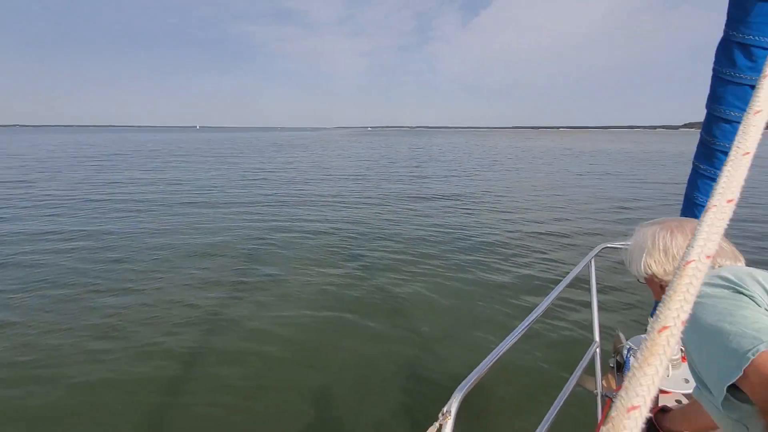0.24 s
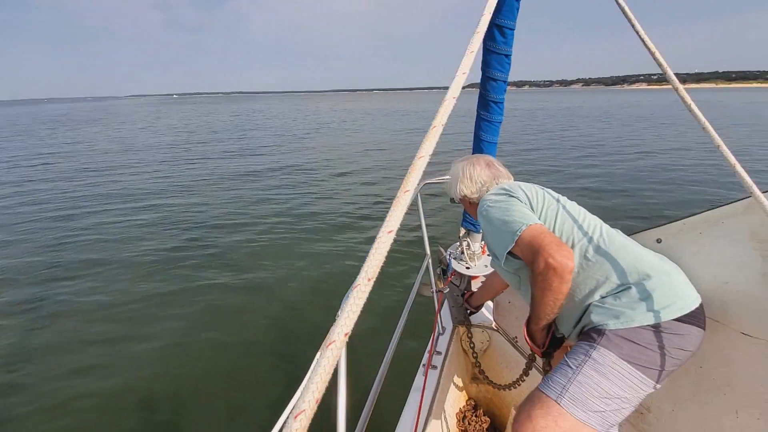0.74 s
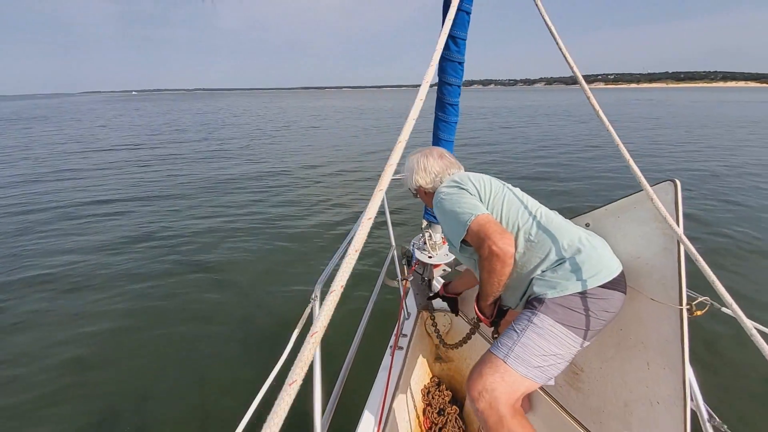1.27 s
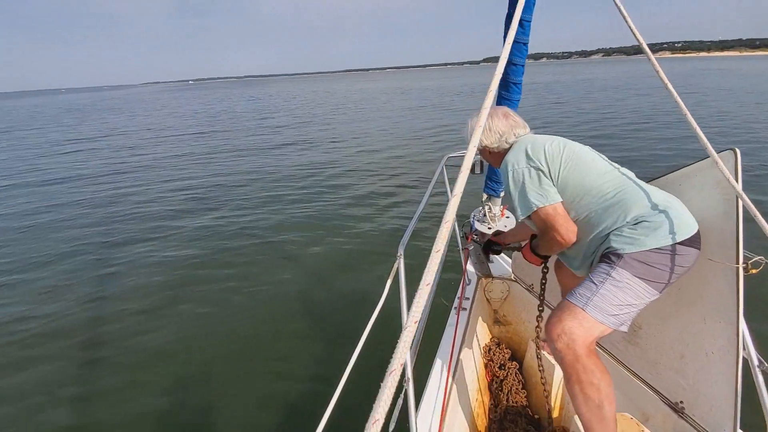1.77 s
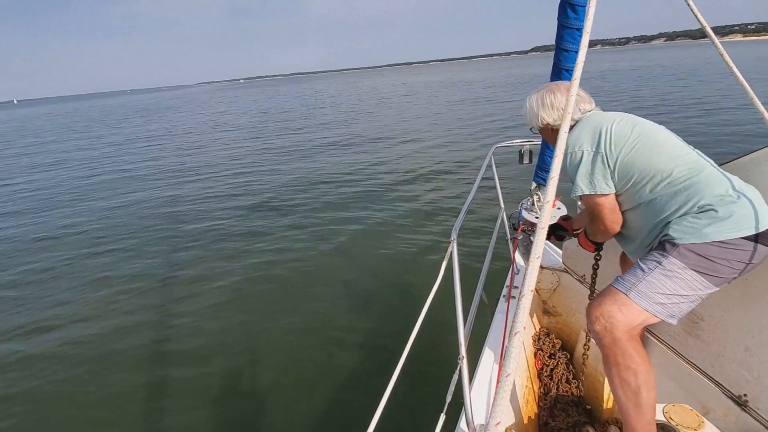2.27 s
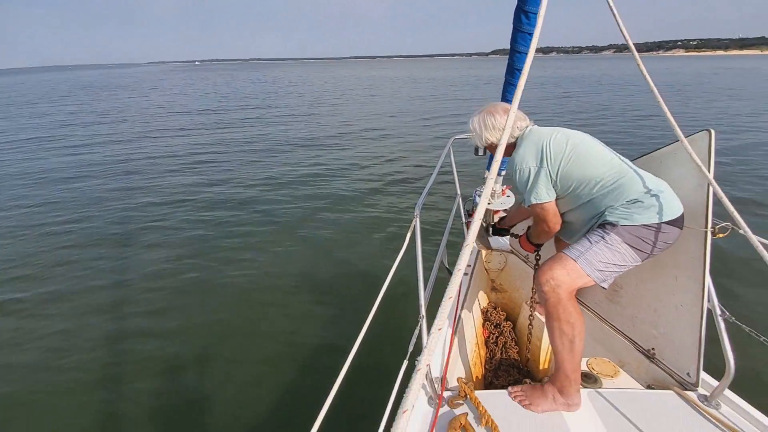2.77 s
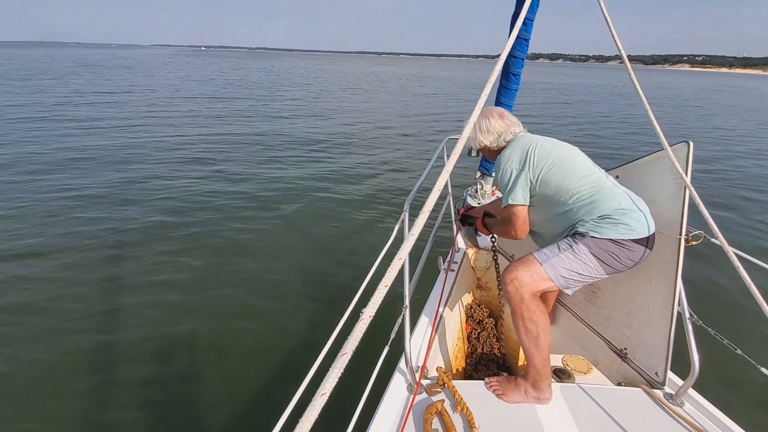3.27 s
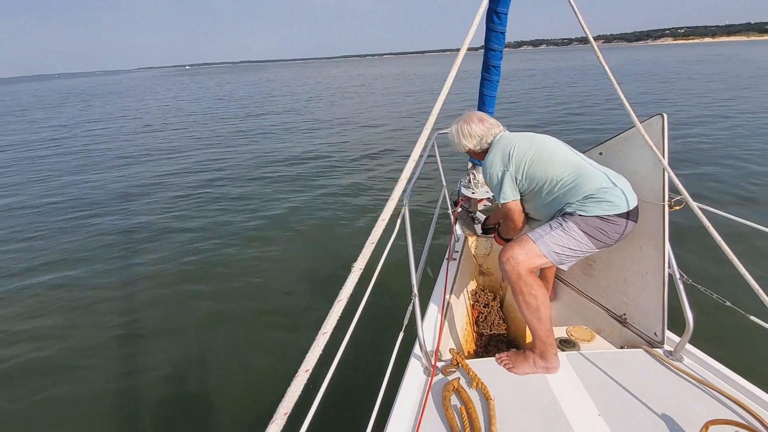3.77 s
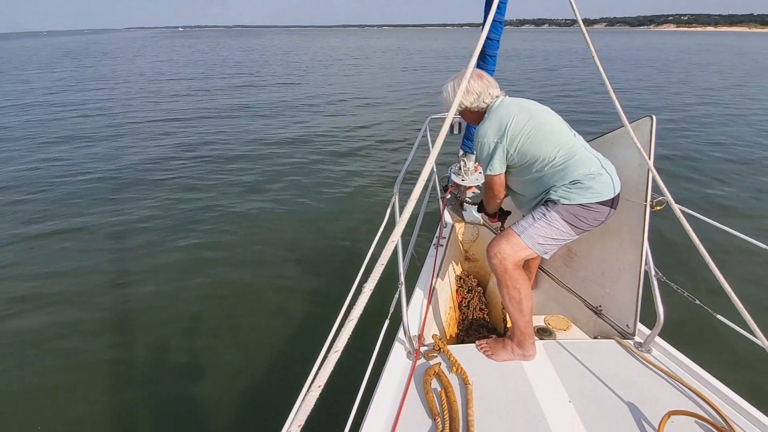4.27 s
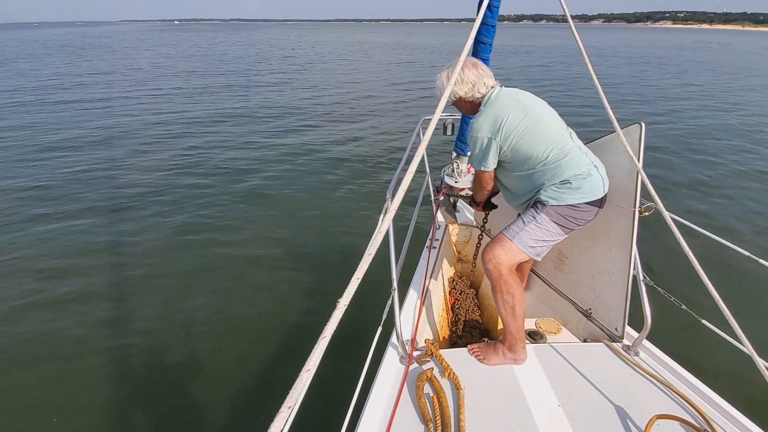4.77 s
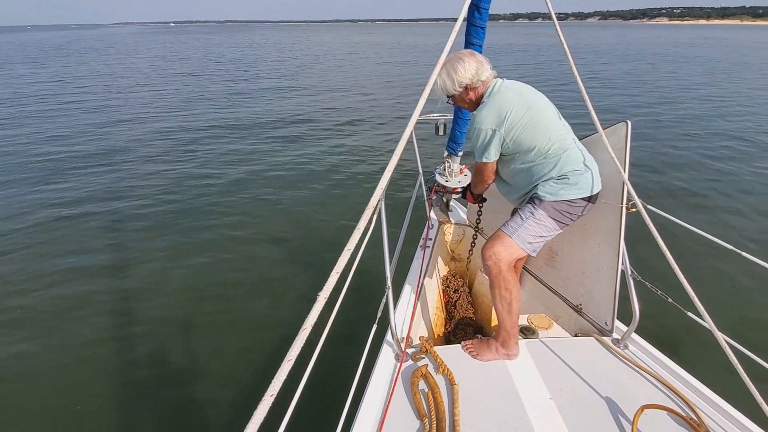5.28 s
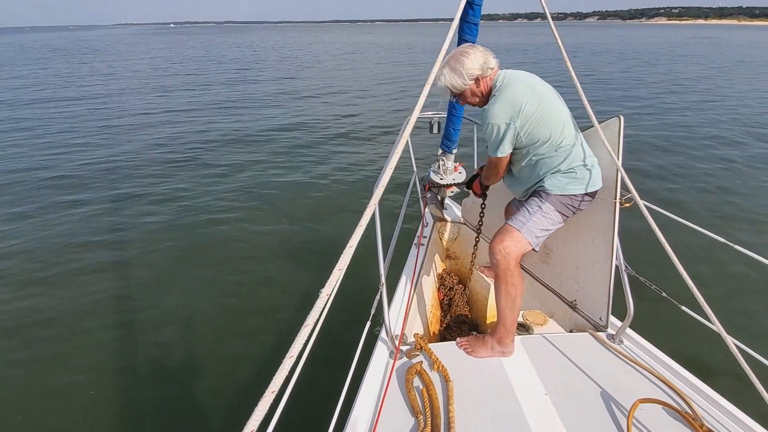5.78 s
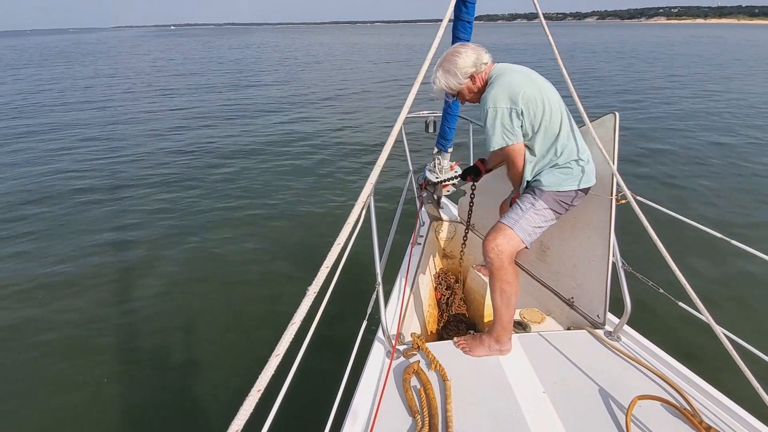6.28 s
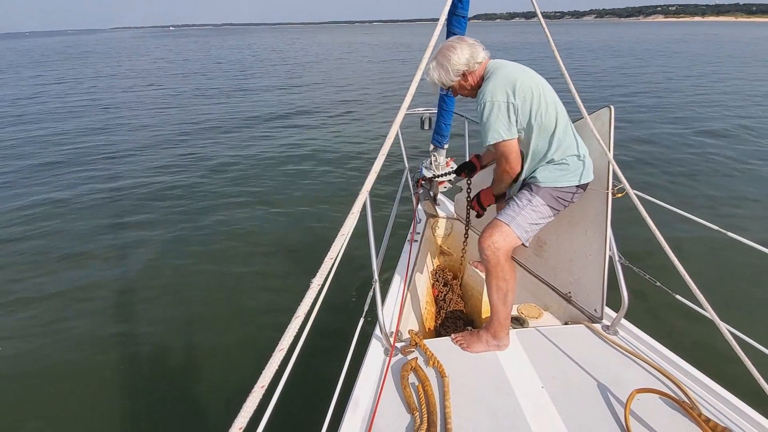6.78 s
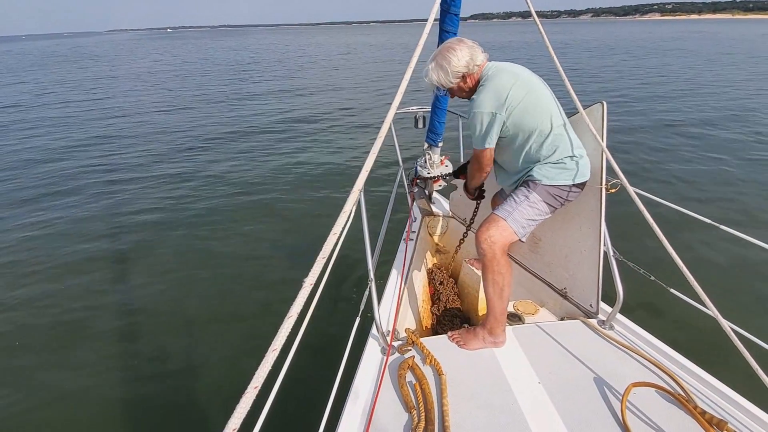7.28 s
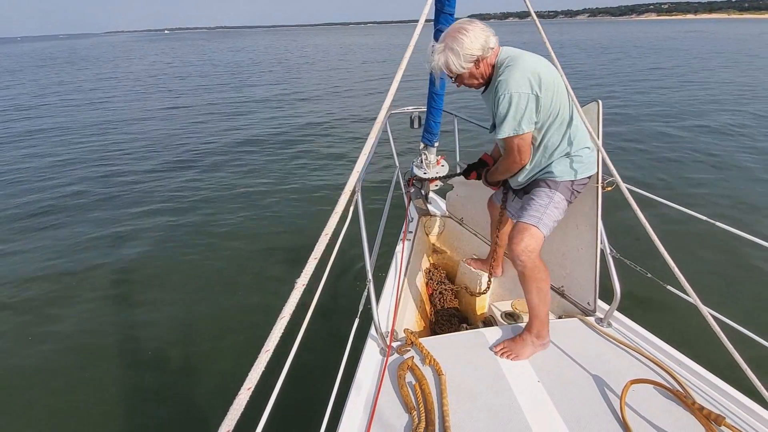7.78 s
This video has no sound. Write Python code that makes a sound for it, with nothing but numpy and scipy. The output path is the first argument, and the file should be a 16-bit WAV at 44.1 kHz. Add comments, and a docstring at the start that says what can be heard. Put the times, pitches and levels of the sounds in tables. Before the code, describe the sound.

On the bow of a small boat on calm open water, heavy chain is handled by hand. A fading metallic ring opens, followed by sparse clinks, then a sharp clattering burst. After a quiet gap, a dense bright run of clacks rings on the steel roller. Shorter pulls follow, ending in a few hard knocks. The hollow hull thumps underneath; water laps faintly. One outdoor microphone, close and dry.

```python
"""Anchor chain over a bow roller

On the bow of a small boat on calm water, an anchor chain is let out by hand, heard at one microphone.
Links clack on the steel roller and the locker edge as shaped noise bursts; roller and rail ring on as
decaying sines. Loose links rattle in between as noise and clinks from random contacts, and the hollow
hull rumbles as filtered thumps. Water laps as swelling noise; short rising chirps are gliding sines,
bubbles at the waterline or squeaks of links."""
import sys
import numpy as np
from scipy import signal
from scipy.fft import rfft, irfft
from scipy.io import wavfile
from scipy.ndimage import uniform_filter1d

SR = 44100
rng = np.random.default_rng(int(sys.argv[2]) if len(sys.argv) > 2 else 0)


def ratio(d):
    """dB to gain"""
    e = np.asarray(d, float) / 20
    return 10 ** e


def unload_wav(signal):
    """Save mono or channel-first audio to the path in sys.argv[1] as 16-bit WAV at rate SR, clipped to [-1, 1]."""
    wavfile.write(
        sys.argv[1],
        SR,
        np.round(np.clip(np.atleast_2d(signal).T, -1, 1) * 32767).astype(np.int16),
    )


N = 354123  # length in samples


def evened(x):
    """Scales to rms 1."""
    return x / np.sqrt(np.mean(x ** 2) + 1e-20)


def read(points, hz):
    """Value of a spectrum table on a log-frequency axis."""
    f, value = np.transpose(points)
    return np.interp(np.log(hz + 1), np.log(f + 1), value)


def add(mix, s, sound):
    """Mixes a sound in at s seconds."""
    part = mix[round(s * SR):][:len(sound)]
    part += sound[:len(part)]


def colour(x, points):
    """Filters x by a spectrum table."""
    gain = ratio(read(points, np.fft.rfftfreq(len(x), 1 / SR)))
    return irfft(rfft(x) * gain, len(x))


def ring(pushes, modes_hz, modes):
    """Row k of pushes drives mode k, a two-pole resonator that rings as a decaying sine."""
    out = np.zeros(N)
    for push, hz, (db, t60) in zip(pushes, modes_hz, modes):
        radius = 1000 ** (-1 / (t60 * SR))
        turn = 2 * np.pi * hz / SR
        poles = [1, -2 * radius * np.cos(turn), radius * radius]
        out += ratio(db) * signal.lfilter([np.sin(turn)], poles, push)
    return out


def ticks(per_s, spread_db):
    """Random contacts of uneven size and either sign."""
    size = ratio(spread_db * np.minimum(rng.exponential(1, N), 5))
    return size * (rng.random(N) < per_s / SR) * rng.choice([-1., 1.], N)


def gated_noise(contacts, t60, bed):
    """Noise that flares at each contact and falls 60 dB in t60 seconds towards a steady bed."""
    puff_power = ratio(-120 * np.arange(4000) / SR / t60)
    power = abs(signal.oaconvolve(contacts ** 2, puff_power)[:N]) + bed
    return np.sqrt(power) * rng.standard_normal(N)


# Stretches of chain sound, one curve each: pulls, dying away, quiet swaying between.
# Each row of a curve: time in seconds, rattle level in dB.
STRETCHES = [
    [(0, -35.5), (.12, -43.5), (.19, -50), (.3, -65), (.6, -72), (.68, -60), (.922, -61)],
    [(.94, -44.5), (1.1, -50), (1.24, -41), (1.44, -39.5)],
    [(1.502, -29.5), (1.63, -22.5), (1.698, -27.5), (1.779, -37.5), (1.89, -60)],
    [(1.915, -45), (1.96, -45), (1.984, -29), (2.05, -28), (2.16, -44.5), (2.28, -52.5), (2.477, -66.5)],
    [(2.495, -38.5), (2.55, -47.5), (2.585, -56.5), (2.645, -40.5), (2.67, -50), (2.76, -55.5),
     (2.79, -60.5)],
    [(2.83, -65), (3.375, -71)],
    [(3.385, -50.5), (3.42, -51.5), (3.44, -43.5), (3.67, -37.5), (3.76, -54), (3.88, -63.5)],
    [(3.921, -42.5), (3.981, -31.5), (4.062, -32), (4.13, -45), (4.22, -42)],
    [(4.36, -32.5), (4.519, -26), (5.059, -28), (5.25, -33), (5.4, -27.5), (5.55, -40), (5.66, -40)],
    [(5.7, -60.5), (5.82, -54.5), (6.05, -70), (6.172, -61)],
    [(6.202, -41.5), (6.35, -35), (6.47, -32), (6.55, -47.5), (6.59, -56), (6.7, -68.5), (6.84, -75)],
    [(6.89, -58.5), (6.93, -77.5), (7.1, -84.5), (7.298, -70)],
    [(7.349, -40.5), (7.45, -44.5), (7.64, -54), (7.7, -46), (7.9, -46.5), (8.03, -53)],
]


def chain_level_db(late_s=0):
    """Level of the chain in dB, per sample, delayed by late_s."""
    return np.interp(np.arange(N) / SR - late_s, *np.vstack(STRETCHES).T)


# How the chain lies in each stretch, in the order of STRETCHES.
# Each row: hull rumble offset in dB, brightness in dB, relative ringing of the roller over the rattle in dB.
STRETCH_COLOURS = [(0, -12, -1), (1.5, -8, -27), (1, 0.5, -2), (1, 4.5, -7), (2.5, 6, 0.5), (-2, 11, -5.5),
                   (0.5, 6, -9.5), (0.5, 5.5, -7), (-1.5, 6.5, 5.5), (-3.5, -20.5, -15.5), (-1.5, 3, -26.5),
                   (5.5, -9, -13), (-7, 2.5, -20)]


def per_stretch(column):
    """One column of STRETCH_COLOURS, held through each stretch and gliding to the next."""
    ends = [rows[k][0] for rows in STRETCHES for k in (0, -1)]
    return np.interp(np.arange(N) / SR, ends, np.repeat(np.array(STRETCH_COLOURS)[:, column], 2))


def clinks(count):
    """Rusty links knock together; each rings briefly on a pitch of its own."""
    train = ticks(2500, 3.5)
    link = rng.integers(0, count, N)
    t = np.arange(2500) / SR
    pitches = np.geomspace(900, 6500, count)[:, None]  # Hz
    voices = np.sin(2 * np.pi * pitches * t) * ratio(-60 * t / 0.079) * np.sqrt(pitches)
    return sum(signal.oaconvolve(train * (link == k), voice)[:N] for k, voice in enumerate(voices))


# Colour of the loose links. Each row: frequency in Hz, level in dB per Hz.
RATTLE_COLOUR = [(290, -36.5), (500, 11.5), (603, -9), (717, 3), (1830, 1.5), (2440, 1.5), (2620, 2.5),
                 (4670, 4.5), (5350, -6), (5750, -1), (6300, -18.5), (7000, -7), (7800, -13), (9500, -13),
                 (10800, -20.5), (15600, -30.5)]


def rattle():
    """Scraping and clinking links, brighter when the chain is taut, thinner when it barely moves."""
    scrape = evened(gated_noise(ticks(260, 3.2), t60=.014, bed=.7))
    links = evened(colour(scrape + ratio(-0.5) * evened(clinks(count=90)), RATTLE_COLOUR))
    low = signal.sosfiltfilt(signal.butter(2, 2600, fs=SR, output="sos"), links)
    high = signal.sosfiltfilt(signal.butter(4, 6200, "high", fs=SR, output="sos"), links)
    middle = links - low - high
    bright_db, level_db = per_stretch(column=1), chain_level_db()
    low_gain = ratio(-.4 * bright_db + 0.13 * (level_db + 39.5))
    return ratio(level_db) * (low * low_gain + middle + high * ratio(bright_db))


# Modes of the steel roller and its cheeks: a list of frequencies in Hz, and in the same order
# each row: level in dB, 60 dB decay in seconds. Single blows shift these values further.
ROLLER_HZ = [1632, 2433, 2702, 3155, 3285, 3395, 3600, 4390, 4775, 4952, 5085, 5713, 7111, 8497, 8860, 9236,
             10130, 11105, 12580, 13930, 14690]
ROLLER_MODES = [(-11, .14), (-7, .2), (-9, .14), (-12, .15), (-6, .2), (-11, .15), (-9, .08), (0, .15),
                (-9, .18), (-6, .22), (-8, .18), (-10, .2), (-15, .2), (-12, .18), (-22, .15), (-25, .2),
                (-24, .15), (-22, .13), (-19, .16), (-30, .15), (-33, .15)]


def roller_under_chain():
    """Some contacts of the chain ring the roller, each on one mode, the high modes less."""
    train = ticks(1800, 0.83) * ratio(chain_level_db() + per_stretch(column=2) - 14.5)
    spot = rng.integers(0, len(ROLLER_HZ), N)
    pushes = (train * (spot == k) * min(1, 5700 / hz) ** 1.5 for k, hz in enumerate(ROLLER_HZ))
    return ring(pushes, ROLLER_HZ, ROLLER_MODES)


def roller_blow(chance, peak_db, centre_hz, ring_db, tilt_db):
    """One blow on the roller: modes near the clack ring most, soft blows ring little, a resting chain damps."""
    t = np.arange(12000) / SR
    hz, (db, t60) = np.array(ROLLER_HZ), np.transpose(ROLLER_MODES)
    ring_db = min(ring_db, -2 + .85 * peak_db)
    # a dull blow misses the high modes
    high_slope_db = min(1.2 * (tilt_db - 10) + .5 * (peak_db + 5), 0)
    db = db + 5 * chance[0] + high_slope_db * np.log2(np.maximum(hz, 5700) / 5700)
    db = db + 8 * np.exp(-(np.log2(hz / centre_hz) / .08) ** 2)
    # the weaker the ring, the shorter it lasts
    t60 = t60 * ratio(.35 * (ring_db + 9) + 2.0 * chance[1])
    hz = hz * (1 + 0.0025 * chance[2])
    modes = ratio(db[:, None] - 60 * t / t60[:, None]) * np.sin(2 * np.pi * hz[:, None] * t)
    return ratio(peak_db + ring_db) * modes.sum(0) * np.minimum(t / .001, 1)


def opening_ring():
    """A faint ring of the roller at the very start, its modes near 3290 Hz raised, with no clack."""
    out = np.zeros(N)
    no_chance = np.zeros((3, len(ROLLER_HZ)))
    add(out, 0, ratio(-21) * roller_blow(no_chance, peak_db=0, centre_hz=3290, ring_db=-3, tilt_db=-3))
    return out


# Colour of the hollow hull. Each row: frequency in Hz, relative level in dB.
HULL_COLOUR = [(15, -54), (25, -27), (96, 0), (144, -8.5), (198, -9), (233, -0.5), (279, 4.5), (345, -5.5),
               (407, -7), (465, -2.5), (541, -16), (657, -9), (900, -17), (1170, -30), (1980, -120)]


def hull():
    """Soft thumps of the chain drum the hollow bow, a little after the rattle."""
    level_db = -45 + 0.89 * (chain_level_db(late_s=0.009) + 40) + per_stretch(column=0)
    thumps = gated_noise(ticks(58, 3.2), t60=0.11, bed=1.7)
    return ratio(level_db) * evened(colour(thumps, HULL_COLOUR))


# Colour of the lapping water. Each row: frequency in Hz, relative level in dB.
WATER_COLOUR = [(15, -31.5), (25, -1), (59, 10), (98, 8), (156, 14.5), (397, -20), (451, -32.5), (615, -26),
                (737, -16), (1440, -11), (1770, -33.5), (3380, -37.5), (4160, -25), (5390, -25.5),
                (12000, -42), (15600, -74), (22000, -120)]


def water():
    """Faint lapping: coloured noise whose level in dB swells slowly at random."""
    smooth = uniform_filter1d(uniform_filter1d(rng.standard_normal(N), 3000), 3000)
    level_db = -67 + 3.9 * evened(smooth)
    return ratio(level_db) * evened(colour(rng.standard_normal(N), WATER_COLOUR))


# Modes of the lightly damped steel rail on the bow: a list of frequencies in Hz, and in the same order
# each row: level in dB, 60 dB decay in seconds.
RAIL_HZ = [894, 1480, 1895, 2345, 2600, 4350, 4931]
RAIL_MODES = [(-4, .75), (-5, 1.0), (-10, .45), (-9, .85), (-14, .6), (1, .62), (0, .48)]
# Jolts that reach the rail. Each row: start in seconds, level in dB,
# extra level of the modes under 2 kHz in dB, extra level of the top mode in dB.
JOLTS = [(0.001, -29, -14, -26), (1.7345, -41.5, -5, 4), (2.0632, -36, 0, 7), (5.608, -49.5, -3.5, -17),
         (6.3273, -41, -25, -15), (6.6115, -72, -22, -22), (6.8694, -80, -25, -20)]


def rail():
    """Long clear ringing of the rail after the jolts that reach it."""
    hz = np.array(RAIL_HZ)
    pushes = np.zeros((len(hz), N))
    for s, db, low_db, top_db in JOLTS:
        pushes[:, round(s * SR)] = ratio(db + low_db * (hz < 2000) + top_db * (hz > 4600))
    return ring(pushes, RAIL_HZ, RAIL_MODES)


# Colour of a blow, before its own bump and tilt. Each row: frequency in Hz, level in dB per Hz.
CLACK_COLOUR = [(120, -42.5), (200, -11), (327, -7), (744, -7), (893, -3.5), (1070, -3.5), (1820, -3),
                (4130, -3.5), (5300, -9.5), (5750, -10.5), (6300, -19), (7000, -16.5), (8000, -23),
                (9560, -25.5), (15600, -58.5)]


def clack(noise, peak_db, centre_hz, tilt_db, t60, centre_db):
    """A sharp first contact and a burst of noise; the deck adds a duller, longer tail."""
    t, hz = np.arange(len(noise)) / SR, np.fft.rfftfreq(len(noise), 1 / SR) + 1
    bump_db = centre_db * np.exp(-(np.log2(hz / centre_hz) / 0.21) ** 2)
    slope_db = tilt_db * np.log2(np.maximum(hz, 600) / 3000)
    shade = ratio(read(CLACK_COLOUR, hz) + bump_db + slope_db)
    burst = evened(irfft(rfft(noise) * shade, len(noise)))
    dull = signal.lfilter([.4], [1, -.6], burst)
    top = irfft(rfft(burst) * (hz > 6200), len(noise))
    middle = burst - dull - top
    # the dull part outlasts the rest
    body = dull * ratio(-60 * t / t60) + middle * ratio(-60 * t / (0.48 * t60)) + top * ratio(-60 * t / (0.5 * t60))
    first = 1 + np.exp(-t / 0.0025)
    rise = 1 - np.exp(-t / (0.00076 * ratio(-1.5 * tilt_db)))  # dull blows start softer
    deck = ratio(-19 - 60 * t / 0.074) * dull[::-1]
    return ratio(peak_db - 10.5) * rise * (first * body + deck)


def strike(out, s, peak_db, centre_hz, tilt_db, ring_db, t60, centre_db):
    """One link strikes: a clack, and the ring it sets off in the roller."""
    noise = rng.standard_normal(8192)
    chance = rng.standard_normal((3, len(ROLLER_HZ)))
    add(out, s, clack(noise, peak_db, centre_hz, tilt_db, t60, centre_db))
    add(out, s, roller_blow(chance, peak_db, centre_hz, ring_db, tilt_db))


# Link blows. Each row: start in seconds, relative peak in dB, centre of the clack in Hz,
# brightness in dB per octave, ring of the roller in dB (capped for soft blows).
BLOWS = [(0.2112, -12, 970, 0.5, -27), (0.622, -18, 4140, 1.5, -25), (0.814, -28.5, 3900, 0.5, -23),
         (1.041, -28.5, 4600, -6, -18), (1.1867, -11.5, 5240, 3, -20), (1.3508, -29.5, 4530, 7, -15.5),
         (1.391, -18, 3850, 4, -15), (1.4562, -19, 4370, 1, -18), (1.488, -6, 3070, 2, -6.5),
         (1.5201, -3.5, 4760, 1.5, -10.5), (1.5721, -1, 4420, 11, -18.5), (1.5875, -7, 5090, 1.5, -24.5),
         (1.5918, -8, 2690, 7.5, -9), (1.6094, -17, 4890, 0, -27.5), (1.734, -1.5, 4670, 4.5, -21.5),
         (1.974, -12, 1420, -3.5, -42), (2.0318, -23, 2680, 17, -3), (2.0622, -2, 3660, 2.5, -15.5),
         (2.174, -26.5, 4400, 8.5, -12), (2.2195, -28, 5100, 10, -15), (2.4924, -31, 4560, 3.5, -11),
         (2.5294, -23.5, 4540, 1, -18), (2.617, -30, 4440, 10.5, -6), (2.6418, -26.5, 4350, 5, -19),
         (2.6911, -27.5, 4400, 4.5, -13), (3.4372, -30.5, 1640, -1.5, -4), (3.5419, -18.5, 4700, 8, -15),
         (3.6075, -15, 2060, 18, -9), (3.6496, -22, 4840, 3.5, -37), (3.6869, -23, 4700, 8, -25),
         (3.91, -30.5, 2800, 0, -3.5), (3.9582, -28, 4360, 10, -4), (4.0109, -13.5, 2500, 4.5, -6.5),
         (4.1442, -10.5, 2380, -1, -25), (4.1553, 2, 1900, -2.5, -38.5), (4.1901, -1, 1880, -0.5, -27.5),
         (4.2867, -18, 3200, 3, -9), (4.3254, -13.5, 4940, 4.5, 1), (4.4368, -13.5, 3150, -6, -15),
         (4.47, -5, 4740, 9.5, -10.5), (4.5281, -15.5, 4400, 10.5, -25), (4.57, -4.5, 3070, 13.5, -12.5),
         (4.6717, -7, 4740, 14, -9.5), (4.7289, -14.5, 4400, -1, -16), (4.7759, -4, 3410, 13.5, -13),
         (4.8282, -13, 4390, 3, -12.5), (4.9316, -1, 3640, 2.5, -13.5), (4.99, -8, 4960, 8, -14),
         (5.0115, 0.5, 3630, 4.5, -15.5), (5.0212, -10.5, 5350, 7, -20.5), (5.093, -2, 4026, 7, -23),
         (5.1067, -9.5, 3570, -0.5, -34.5), (5.1363, -6.5, 1450, -5.5, -24), (5.247, -6, 4770, 5.5, -25.5),
         (5.2576, -5.5, 3170, 4, -22), (5.3424, 0.5, 3260, 5, -22.5), (5.3634, -7.5, 5040, 2, -40),
         (5.428, -13, 4700, -3, -5), (5.4791, -13.5, 3230, 14.5, -22.5), (5.545, -16.5, 1520, -1, -10),
         (5.6114, -8.5, 3850, 4.5, -25.5), (6.2063, -22.5, 4530, 3, -6), (6.248, -25, 1640, -2, -3),
         (6.664, -39.5, 4570, 3.5, -4), (6.301, -7, 3570, 4, -29), (6.3291, -11, 2420, -0.5, -15),
         (6.3787, -5.5, 3480, 5.5, -26), (6.445, -27.5, 1590, 9.5, -11), (6.5164, -16, 3550, 0.5, -34),
         (6.6112, -29.5, 3160, -1.5, -21), (6.8682, -26.5, 4140, 6.5, -22), (7.4006, -11.5, 4400, 2, -45),
         (7.424, -5, 1410, 0.5, -46), (7.4748, -24.5, 4500, 13.5, -24), (7.5295, -24.5, 2140, 1, -33),
         (7.5902, -9.5, 3940, 3.5, -48), (7.6813, -26.5, 4100, 9, -15.5), (7.8198, -26, 4000, 13.5, -17),
         (7.8385, 1.5, 2760, 0, -27), (7.8454, 1, 2570, -1.5, -27), (7.858, -1, 2330, -2.5, -36),
         (7.9616, -23, 4180, 4.5, -35), (7.9774, -18.5, 950, 0.5, -37)]


def blows():
    """Single links hit the roller and the locker edge; lower clacks last slightly longer."""
    out = np.zeros(N)
    for s, peak_db, centre_hz, tilt_db, ring_db in BLOWS:
        t60 = 0.07 * (centre_hz / 4000) ** -0.074  # seconds
        strike(out, s, peak_db, centre_hz, tilt_db, ring_db, t60, centre_db=8)
    return out


# Faint taps. Each row: start in seconds, relative peak in dB.
TAPS = [(0.4873, -48), (0.6424, -38), (0.7223, -47), (0.979, -44), (1.1312, -40), (2.2411, -36),
        (2.3151, -38), (2.75, -32), (2.768, -32), (2.8659, -40.5), (3.128, -37), (3.1905, -39.5),
        (3.2072, -39), (3.391, -38.5), (5.8037, -41), (5.9227, -40), (5.9452, -45), (6.756, -51.5),
        (6.82, -46.5), (6.8566, -29.5), (7.366, -42.5), (7.5057, -28), (7.726, -31.5), (7.7889, -30),
        (7.9192, -27.5)]


def taps():
    """Dangling links tap faintly, mostly while the chain is quiet, all with one bright colour."""
    out = np.zeros(N)
    for s, peak_db in TAPS:
        strike(out, s, peak_db, centre_hz=4500, tilt_db=11, ring_db=-21.5, t60=0.058, centre_db=12.5)
    return out


# Short rising chirps: bubbles at the waterline or squeaks of links. Each row: start in seconds,
# level in dB, starting pitch in Hz, rise of pitch as a fraction per second, 60 dB decay in seconds.
CHIRPS = [(1.925, -23.5, 3540, 1.6, 0.07), (3.731, -31.5, 1940, 2.3, 0.075), (5.685, -41.5, 1320, 19, 0.06),
          (5.83, -33.5, 776, 5.8, 0.033), (5.842, -35.5, 351, 5.6, 0.085), (6.05, -53, 500, 7.6, 0.065),
          (6.182, -48, 238, 9.7, 0.11)]


def chirps():
    """Decaying sines that glide upwards in pitch."""
    out = np.zeros(N)
    t = np.arange(6000) / SR
    for s, db, hz, rise, t60 in CHIRPS:
        envelope = ratio(db - 60 * t / t60) * (1 - np.exp(-t / 0.0026))
        add(out, s, envelope * np.sin(2 * np.pi * hz * (t + rise * t * t / 2)))
    return out


def scene():
    """All sources at one microphone."""
    chain = rattle() + roller_under_chain() + opening_ring()
    boat = hull() + rail()
    return (chain + boat + water() + blows() + taps() + chirps())[None]


def band_limit(x):
    """A steep low-pass at the top of the band."""
    return signal.sosfilt(signal.butter(12, 15800, fs=SR, output="sos"), x)


def record(dry):
    """The microphone drops the deepest bass, the loudest peaks are rounded off, the top is cut."""
    ceiling = 0.98  # of full scale
    heard = signal.sosfilt(signal.butter(2, 50, "high", fs=SR, output="sos"), dry)
    rounded = ceiling * np.tanh(heard / ceiling)
    edge = signal.firwin(255, 15900, window=("kaiser", 9), fs=SR)
    finished = signal.oaconvolve(rounded, edge[None], "same")
    return band_limit(finished)


dry = scene()
out = record(dry)
unload_wav(out)
```